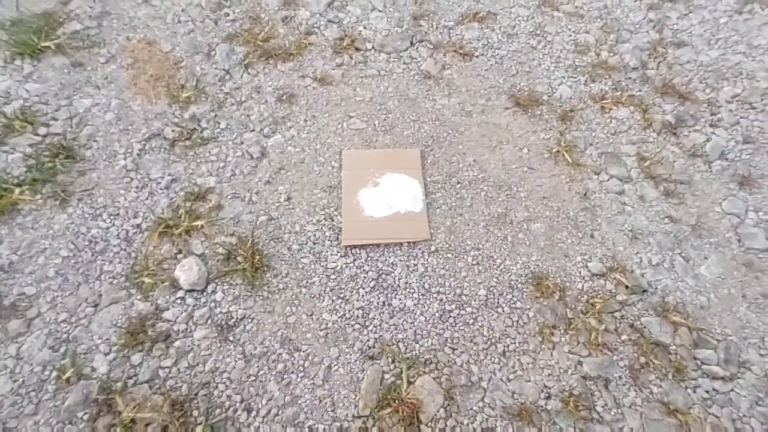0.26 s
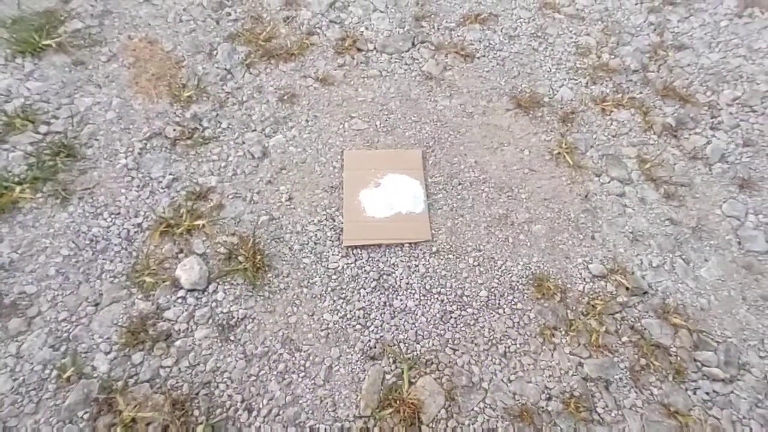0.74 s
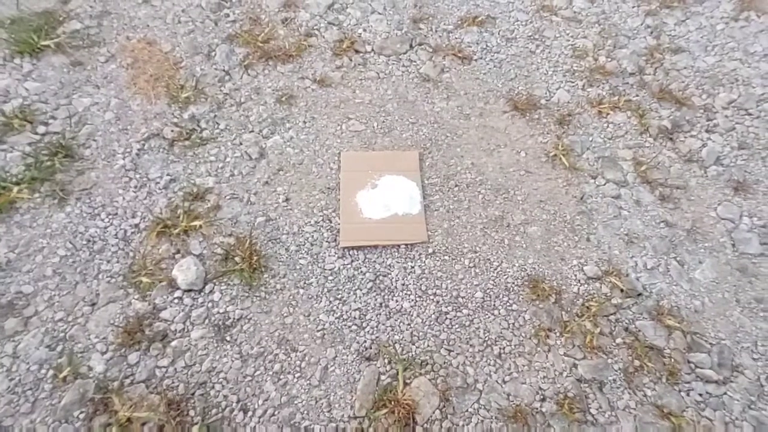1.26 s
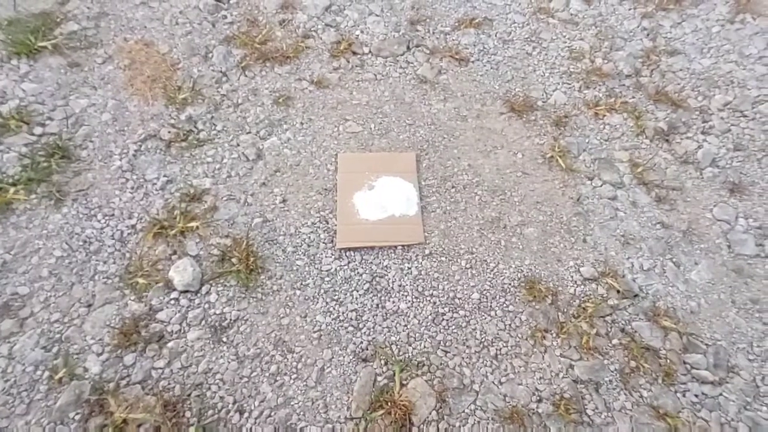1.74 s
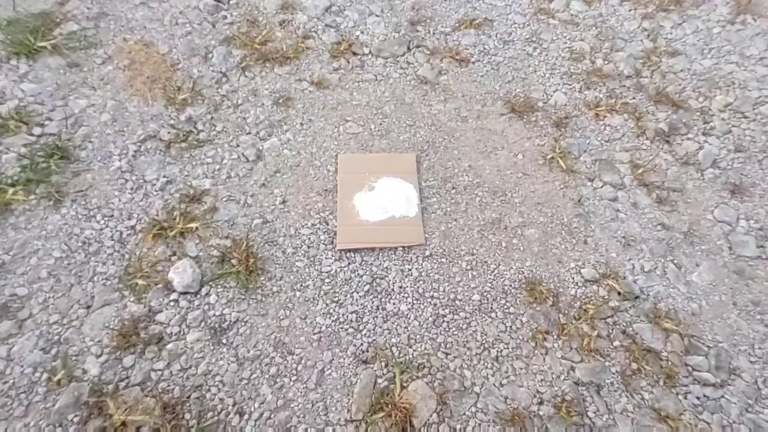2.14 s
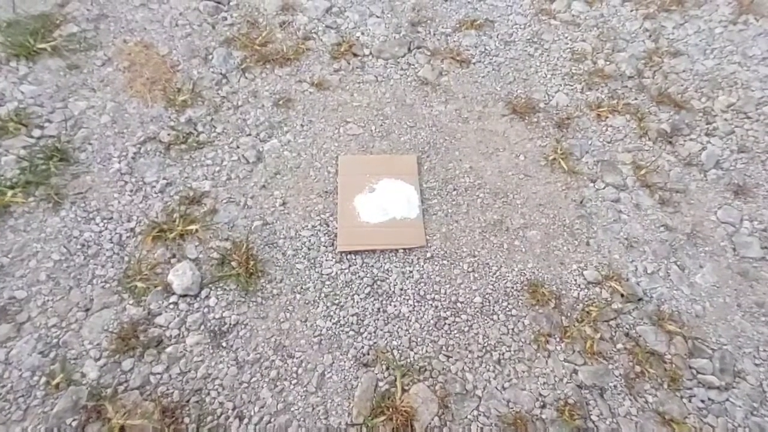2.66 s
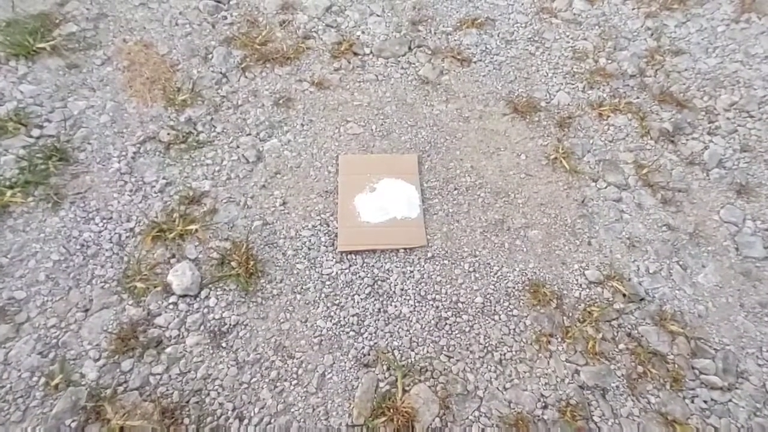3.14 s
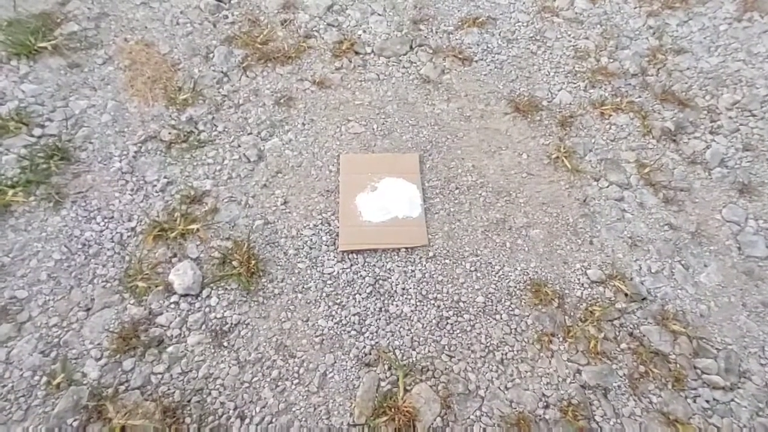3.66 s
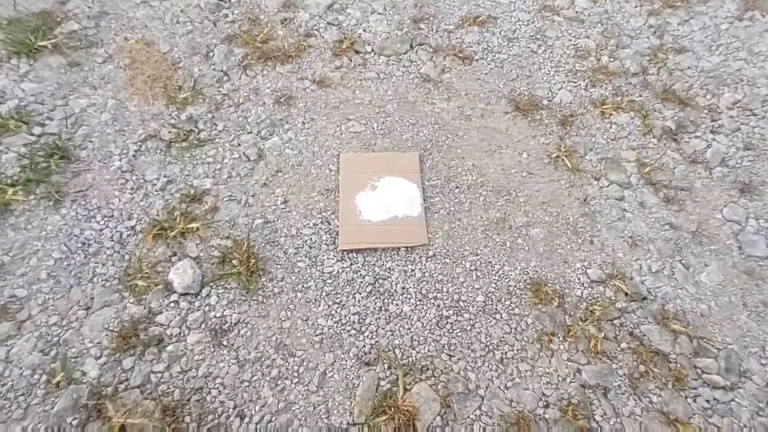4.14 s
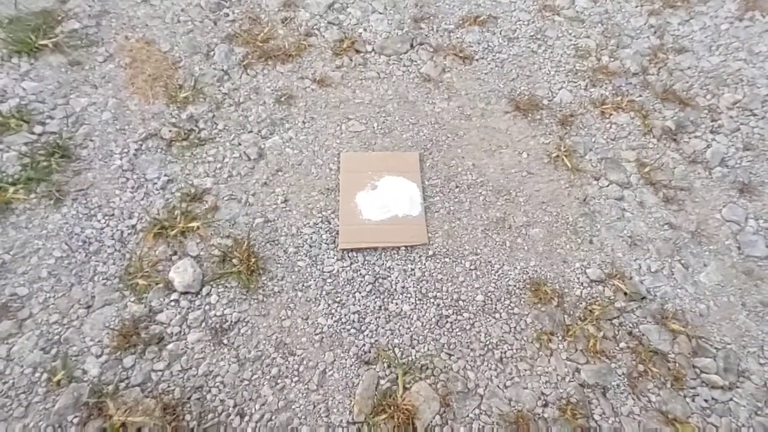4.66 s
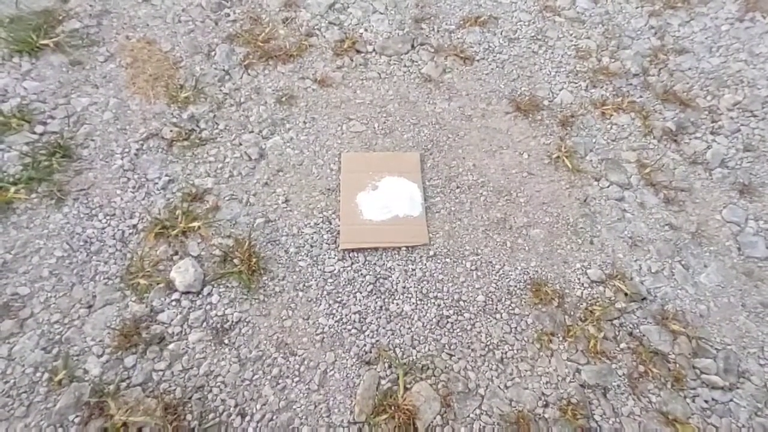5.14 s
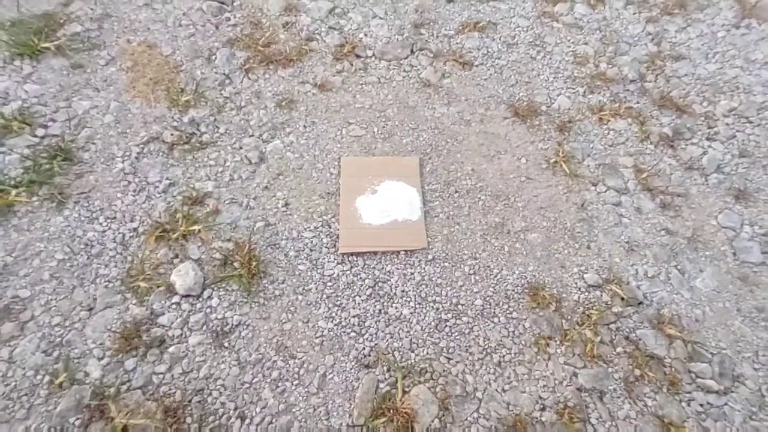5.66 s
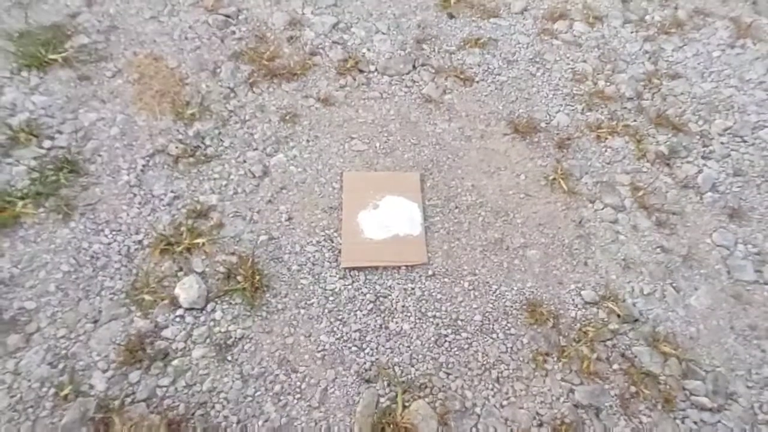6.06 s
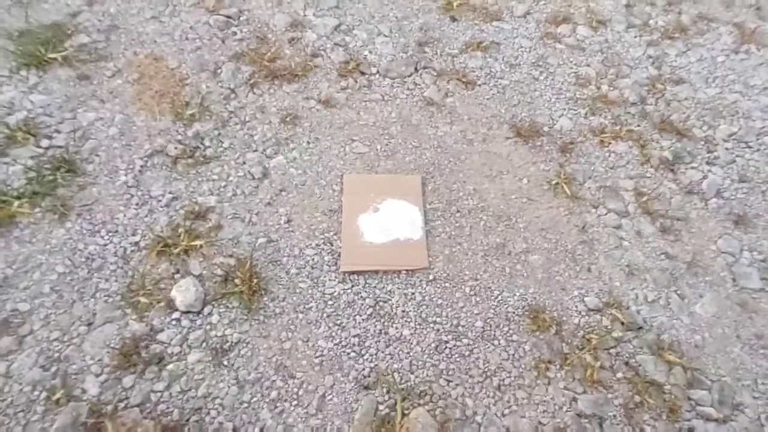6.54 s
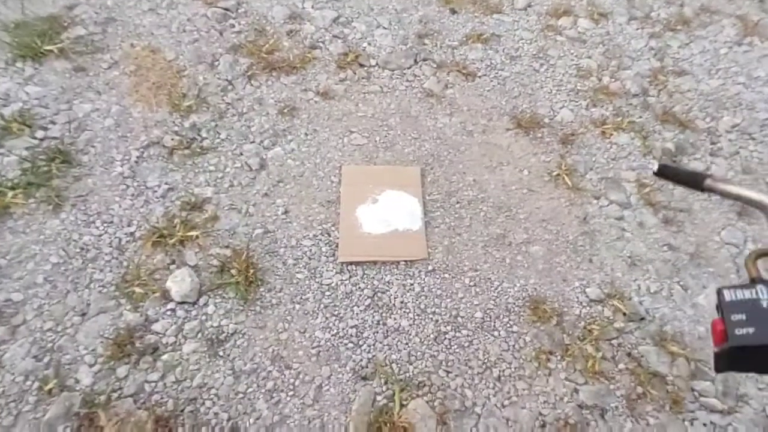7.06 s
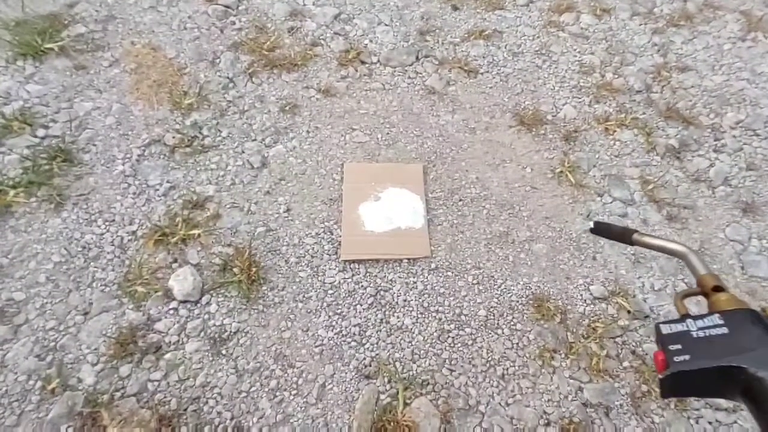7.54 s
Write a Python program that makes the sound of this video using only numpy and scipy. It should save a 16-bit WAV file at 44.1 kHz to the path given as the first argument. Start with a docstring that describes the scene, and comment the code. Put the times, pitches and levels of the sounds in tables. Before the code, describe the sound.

A handheld gas torch roars and hisses steadily outdoors, its tone sweeping upward like a slow flanger, dipping suddenly near the end, then rising again.

```python
"""A low roar and a bright hiss are heard at once, while notches sweep up the spectrum, later down and up again.
A handheld gas torch burns outdoors over gravel, close to a stereo microphone. Flame and gas jet are shaped noise.
The ground echo interferes with the direct sound as a comb filter; its delay changes as the torch is lowered and raised.
Echoes off things near the microphone and the body behind it add a fine ripple; a diffuse return surrounds them."""
import sys
import numpy as np
from scipy import signal
from scipy.fft import rfft, irfft, next_fast_len
from scipy.io import wavfile
from scipy.ndimage import uniform_filter1d, map_coordinates

SR = 44100
rng = np.random.default_rng(int(sys.argv[2]) if len(sys.argv) > 2 else 0)


def log_audio(samples):
    """Write samples as a 16-bit WAV file to the path given in sys.argv[1]."""
    # one column per channel
    frames = np.atleast_2d(samples).T
    # limit to full scale, then quantise
    limited = np.clip(frames, -1, 1)
    pcm = np.round(limited * 32767).astype(np.int16)
    wavfile.write(sys.argv[1], SR, pcm)


N = 343539   # length in samples

# Path of the torch: t/s, ground echo delay left/ms, the same right/ms, lag of the left port/ms
TORCH_PATH = [(0, 1.58, 1.86, 0.36), (.2, 1.26, 1.5, 0.33), (.38, 1.26, 1.67, 0.26), (.5, 0.93, 0.93, 0.2),
              (.64, 0.81, 0.91, 0.18), (.8, 0.54, 0.64, 0.19), (.94, 0.5, 0.55, 0.17),
              (1.2, .455, 0.51, 0.16), (1.32, 0.40, 0.39, 0.11), (1.7, 0.34, .385, 0.082),
              (2.1, 0.33, 0.37, 0.06), (2.5, 0.3, .36, 0.055), (2.9, 0.29, 0.35, 0.053),
              (3.12, 0.28, 0.32, 0.04), (3.3, 0.22, 0.24, 0.045), (3.55, 0.14, 0.18, 0.041),
              (4.3, 0.15, 0.17, 0.065), (4.72, 0.2, 0.21, 0.05), (5.2, 0.16, 0.15, 0.026),
              (5.55, 0.11, 0.097, 0.023), (5.95, 0.12, 0.14, 0.047), (6.2, 0.18, 0.15, .03),
              (6.3, 0.5, .44, 0.092), (6.38, 0.82, 0.97, .09), (6.45, 1.14, 1.34, 0.11),
              (6.56, 1.56, 1.65, 0.15), (6.65, 2, 2.06, .24), (6.74, 2, 2.2, 0.32), (6.88, 1.5, 1.7, 0.26),
              (7.0, 1.14, 1.37, 0.12), (7.15, 1.03, 1.2, 0.067), (7.22, 0.81, 0.74, 0.045),
              (7.28, 0.4, 0.39, 0.053), (7.4, 0.48, 0.44, 0.069), (7.48, 0.35, 0.37, .056),
              (7.56, 0.14, 0.2, 0.068), (7.64, 0.11, 0.14, 0.057), (7.79, 0.14, 0.16, 0.075)]
# Extra lag of the treble at the left port, earlier where negative: t/s, lag/ms
TREBLE_LAG = [(.45, 0), (.6, -.022), (.9, -.03), (1.15, -.012), (1.3, .006), (1.7, .02), (2.1, .03),
              (2.9, .04), (3.2, .035), (3.5, 0)]
TREBLE_LAG_FROM_HZ = 3000

# Strength of the burn before panning and echoes: t/s, roar level/dB, hiss level/dB, roar bass against its rest/dB
BURN_LEVELS = [(0, -25.5, -34.5, -4), (.5, -25.5, -33, 0), (1.0, -26, -33, -1.5), (2.0, -27, -32, 0),
               (3.0, -25.5, -32.5, -0.8), (3.6, -28, -33.5, 1.5), (4.6, -26.5, -34, 1.5),
               (5.4, -27, -32.5, -1), (6.0, -26, -34, -1.2), (6.35, -27, -33, -0.8), (6.55, -25.5, -34, -3),
               (6.7, -26, -39, -5), (6.85, -25, -35, -2.5), (7.1, -27, -30, -3), (7.35, -26, -33, -2),
               (7.55, -28, -34.5, 2), (7.79, -25, -35.5, -1)]
LOUD_SPOT_S, LOUD_SPOT_WIDTH_S, LOUD_SPOT_DB, LOUD_SPOT_TOP_HZ = 7.22, 0.025, 5.5, 2000   # brief, below 2 kHz

# Relative noise spectra of the flame, the body of the hiss and its top: f/Hz, level per Hz/dB
ROAR_SPECTRUM = [(13, -88), (30, -66), (60, -37.5), (100, -30.5), (161, -12), (200, -7), (278, -5.5),
                 (400, -9), (560, -6), (750, -8.5), (1100, -8.5), (1580, -11), (2000, -13.5), (2400, -17),
                 (4230, -19.5), (5200, -22), (6800, -47)]
HISS_SPECTRUM = [(2120, -43), (3600, -10), (4220, -16), (4650, 2), (5050, 9), (5350, 9), (6560, 0.5),
                 (7140, 2.5), (7900, -12.5), (8200, -25), (10700, -53), (18000, -120)]
HISS_TOP_SPECTRUM = [(4120, -18.5), (7000, -2), (7910, -6.5), (8720, 0), (9690, -6.5), (11700, -3.5),
                     (12400, -7), (13200, -18.5)]
# Share of the roar that counts as bass, equally loud at both ports: f/Hz, level/dB
BASS_SHARE = [(220, 0), (700, -30)]
# Port colour for roar and hiss: f/Hz, left minus right level/dB
ROAR_BALANCE = [(500, -8), (870, -1), (1200, -1), (1700, -2), (2300, -6), (2800, -13.5), (3500, -6),
                (5000, 0.5)]
HISS_BALANCE = [(3600, -12.5), (4300, -2), (4900, -0.5), (5400, 1), (6000, -4), (7000, -3), (7800, -13),
                (8700, -10.5), (9700, 3), (11000, 10), (12700, 0)]
# Coherence: the ports hear different parts of the long flame: f/Hz, left-right likeness/1
PORT_LIKENESS = [(25, .3), (60, 0.74), (130, 1), (500, 1), (1000, 0.99), (2000, 0.71), (2600, 0.55),
                 (3200, .9), (3700, .96), (4500, .96), (5000, 0.17), (7000, 0.046), (13000, 0.046)]

# Effect of bearing; the lag grows as the torch moves to the right: level straight ahead/dB, slope/(dB per ms of lag)
ROAR_PAN_RULE = (7.56, -9)   # left minus right
HISS_PAN_RULE = (-0.64, -36)   # left minus right
TOP_SHARE_RULE = (-8.5, 21.8)   # top of the hiss against its body

# Edges of the bands in which the upper flame noise flickers: f/Hz
PATCH_EDGES = [1500, 2100, 2900, 3800, 4800]
PATCHY_DB, PATCHY_DB_PER_SPEED = .9, .2   # at rest; added per ms/s of echo delay change, as air stirs the flame
TREMOR = .025   # hand shake: spread of the ground echo delay as a share of it

# Reflection off gravel, which scatters the treble: f/Hz, level/dB
GROUND_SPECTRUM = [(100, -4.5), (1000, -1.5), (2500, -5), (3400, -7), (4200, -9), (5000, -15), (6000, -20),
                   (12000, -39)]
# Balance of the ground echo: f/Hz, left minus right level/dB
GROUND_BALANCE = [(300, 0), (1200, -4), (2500, -3), (4000, 1.5), (6000, 0)]
SCATTER_HZ, SCATTER_DB_PER_MS = 1500, -5   # more treble is scattered from higher up
SCATTERED_DB = -17   # level of the scattered treble, before its share is applied
HIGH_MS, HIGH_DB_PER_MS = 1.45, -16   # held high: beyond this delay the ground echo weakens
HIGH_SPLIT_HZ, HIGH_UPPER_DB_PER_MS = 700, -1   # above this frequency it loses less

# Echoes off things near the microphone: left delay/ms, left level/dB, right delay/ms, right level/dB,
# growth of the delay/(ms per ms of ground echo delay)
NEAR_REFLECTIONS = [(1.1, -20, 1.1, -26.5, 0.11), (1.55, -23, 1.12, -12, 0.086),
                    (2.1, -19.5, 2.155, -13.5, 0.33), (2.8, -10, 2.825, -14.5, 0.73),
                    (3.9, -13.5, 4.5, -14.5, 0.57)]
NEAR_FROM_HZ, NEAR_CUT_HZ, NEAR_TOP_HZ = 220, 2300, 3740
NEAR_ON_GROUND = 0.19   # share of the ground echo, which arrives from below, that stirs the nearby echoes

# Echoes off the body behind the microphone: delay with the torch on the ground/ms, left gain/1, right gain/1
BODY_REFLECTIONS = [(1.37, 0.021, -0.056), (1.62, -0.015, -0.16)]
BODY_MS_PER_MS = 1.105   # growth of their delay with the ground echo delay

# Sound thrown back from all round, different at each port: f/Hz, level/dB
DIFFUSE_SPECTRUM = [(300, -49), (1000, -17), (2000, -17), (3200, -9), (4500, -19), (8000, -40)]
# Narrow hollows in the ports: f/Hz, width/Hz, left depth/1, right depth/1
PORT_DIPS = [(543, 43, 0.01, 0.63), (1115, 57, 0.67, 0.27), (1430, 82, 0.03, 0.64), (1534, 27, 0.07, 0),
             (1870, 32, 0.6, 0.8), (2194, 57, 0.96, 0.6), (2620, 30, 0.1, 0.34), (2790, 30, 0.2, 0.15),
             (3470, 65, 0.1, 0.84), (4130, 75, 0.6, .2)]
CUTOFF_HZ = 13200   # upper edge of the microphone band


def from_db(db):
    """A level is twenty times the logarithm of its amplitude gain."""
    return 10 ** (np.asarray(db) / 20)


def rms_one(x):
    """Division by the root mean square gives unit effective amplitude."""
    return x / np.sqrt(np.mean(x ** 2) + 1e-20)


def in_time(rows):
    """Linear interpolation turns each table column into one value per sample."""
    t_s, *columns = np.transpose(rows)
    return [np.interp(np.arange(N) / SR, t_s, column) for column in columns]


def bins_hz():
    """The discrete spectrum has equally spaced frequencies; zero is raised to 1 Hz."""
    return np.maximum(np.fft.rfftfreq(next_fast_len(N), 1 / SR), 1)


def on_bins(points):
    """A spectrum table is interpolated on a logarithmic frequency axis."""
    hz, values = np.transpose(points)
    return np.interp(np.log(bins_hz()), np.log(hz), values)


def below(hz, order):
    """Low-pass gain without phase shift, one half at the given frequency."""
    return 1 / (1 + (bins_hz() / hz) ** order)


def above(hz, order):
    """High-pass gain without phase shift, one half at the given frequency."""
    return 1 / (1 + (hz / bins_hz()) ** order)


def coloured(x, gain):
    """Linear filtering is multiplication of the spectrum by a gain."""
    size = next_fast_len(N)
    return irfft(rfft(x, size) * gain, size)[..., :N]


def drift(rate_hz):
    """Low-passed noise is a slow random process, here of unit rms."""
    step = 40   # samples between drawn values
    pole = np.exp(-2 * np.pi * step * rate_hz / SR)
    noise = rng.standard_normal(N // step + 2002)
    slow = signal.lfilter([1], [1, -2 * pole, pole * pole], noise)[2000:]   # the filter has settled
    return np.interp(np.arange(N) / step, np.arange(len(slow)), rms_one(slow))


def late(x, ms):
    """Propagation delay, fixed or moving, by cubic interpolation; the ends are mirrored."""
    return map_coordinates(x, [np.arange(N) - ms * SR / 1000], order=3, mode="mirror")


def late_pair(pair, left_ms, right_ms):
    """Each port has its own path length and hence its own delay."""
    return np.array([late(pair[0], left_ms), late(pair[1], right_ms)])


def sides(pan_db):
    """A level difference is divided equally between left and right gains."""
    return from_db([pan_db / 2, -pan_db / 2])


def with_bearing(rule):
    """Level varies linearly with the time difference between the ports."""
    ahead_db, db_per_ms = rule
    return ahead_db + db_per_ms * in_time(TORCH_PATH)[2]


def diffuse_field(torch):
    """Diffuse reflection: widely shifted copies are out of step with the source and with each other."""
    shifted = [np.roll(torch[0], N // 3), np.roll(torch[1], -N // 3)]
    return coloured(shifted, from_db(on_bins(DIFFUSE_SPECTRUM)))


def body_echoes(arriving, echo_ms):
    """Specular reflection off the body: the delays shorten as the torch is lowered."""
    small = above(NEAR_FROM_HZ, 2)   # small obstacles return no bass
    dull = coloured(arriving, small / (1 + 1j * bins_hz() / NEAR_CUT_HZ))
    total = 0
    for ms, left, right in BODY_REFLECTIONS:
        delay_ms = ms + BODY_MS_PER_MS * echo_ms
        total = total + np.array([[left], [right]]) * late_pair(dull, delay_ms, delay_ms)
    return total


def near_echoes(arriving, echo_ms):
    """Early reflections off small obstacles, with neither deep bass nor full treble, add a fine ripple."""
    small = above(NEAR_FROM_HZ, 2)
    dulling = below(NEAR_TOP_HZ, 4) / (1 + 1j * bins_hz() / NEAR_CUT_HZ)
    faint = coloured(arriving, small * dulling)
    total = 0
    for left_ms, left_db, right_ms, right_db, growth in NEAR_REFLECTIONS:
        delayed = late_pair(faint, left_ms + growth * echo_ms, right_ms + growth * echo_ms)
        total = total + from_db([[left_db], [right_db]]) * delayed
    return total


def gravel_reflection(torch, echo_ms):
    """Rough-surface reflection: coherent treble falls with echo delay as the scattered part grows."""
    bounced = coloured(torch, from_db(on_bins(GROUND_SPECTRUM)) * sides(on_bins(GROUND_BALANCE)))
    treble = coloured(bounced, above(SCATTER_HZ, 2))
    mirrored = from_db(SCATTER_DB_PER_MS * np.maximum(echo_ms - .45, 0))
    scattered = np.roll(treble, N // 2, axis=1)   # same colour, out of step with the direct sound
    scattered = from_db(SCATTERED_DB) * scattered * np.sqrt(1 - mirrored ** 2)
    bounced = bounced - treble * (1 - mirrored) + scattered
    deep = coloured(bounced, below(HIGH_SPLIT_HZ, 4))
    excess_ms = np.maximum(echo_ms - HIGH_MS, 0)
    upper = (bounced - deep) * from_db(HIGH_UPPER_DB_PER_MS * excess_ms)
    return deep * from_db(HIGH_DB_PER_MS * excess_ms) + upper


def treble_shift(torch):
    """Interaural-type time difference: treble reaches the left port slightly earlier or later."""
    treble = coloured(torch[0], above(TREBLE_LAG_FROM_HZ, 8))
    return np.array([torch[0] - treble + late(treble, in_time(TREBLE_LAG)[0]), torch[1]])


def outdoors(torch):
    """Superposition: direct sound and ground echo form a comb filter, and weaker returns are added."""
    left_echo_ms, right_echo_ms, lag_ms = in_time(TORCH_PATH)
    torch = treble_shift(torch)
    shake = 1 + TREMOR * drift(14.0)
    echo_ms = (left_echo_ms + right_echo_ms) / 2
    direct = np.array([late(torch[0], lag_ms), torch[1]])
    bounced = gravel_reflection(torch, echo_ms)
    ground = late_pair(bounced, lag_ms + shake * left_echo_ms, shake * right_echo_ms)
    arriving = direct + NEAR_ON_GROUND * ground
    near = near_echoes(arriving, echo_ms)
    body = body_echoes(arriving, echo_ms)
    return direct + ground + near + body + diffuse_field(torch)


def turbulence(spectrum, balance):
    """Partial coherence: mid and side noises give two ports of set likeness, with unit rms overall."""
    size = next_fast_len(N)
    alike = np.clip(on_bins(PORT_LIKENESS), 0, 1)
    mid, side = rfft(rng.standard_normal((2, size)))
    pair = np.sqrt(1 + alike) * mid + np.sqrt(1 - alike) * side * [[1], [-1]]
    shaped = pair * from_db(on_bins(spectrum)) * sides(on_bins(balance))
    return rms_one(irfft(shaped, size)[:, :N])


def patchy(flame):
    """Amplitude modulation by band: each flickers on its own, more while the torch moves."""
    delay_rate = np.abs(np.gradient(in_time(TORCH_PATH)[1]) * SR)   # right echo delay, ms/s
    speed = uniform_filter1d(delay_rate, SR // 4)
    depth_db = PATCHY_DB + PATCHY_DB_PER_SPEED * np.minimum(speed, 4)
    result = flame
    for low, high in zip(PATCH_EDGES, PATCH_EDGES[1:]):
        band = coloured(flame, (bins_hz() >= low) & (bins_hz() < high))
        result = result + band * (from_db(depth_db * drift(14.0)) - 1)
    return result


def hiss():
    """Jet noise from the burner tube: the body and top of the spectrum flicker partly together."""
    together = drift(5.7)
    body_db = 0.5 * together + 1.05 * drift(36.0)
    body = from_db(body_db) * turbulence(HISS_SPECTRUM, HISS_BALANCE)
    top_db = with_bearing(TOP_SHARE_RULE) + 0.17 * together + 1.0 * drift(18.0)
    top = from_db(top_db) * turbulence(HISS_TOP_SPECTRUM, HISS_BALANCE)
    level_db = in_time(BURN_LEVELS)[1]
    return from_db(level_db) * sides(with_bearing(HISS_PAN_RULE)) * (body + top)


def roar():
    """Combustion noise with flutter; by diffraction, long waves pass the microphone and stay central."""
    level_db, _, bass_db = in_time(BURN_LEVELS)
    flutter_db = 0.7 * drift(14.7) + .5 * drift(46.0)
    whole = turbulence(ROAR_SPECTRUM, [(300, 0)])   # no imbalance at this stage
    share = from_db(on_bins(BASS_SHARE))
    bass = from_db(bass_db) * coloured(whole, share)
    rest = coloured(whole, (1 - share) * sides(on_bins(ROAR_BALANCE)))
    flame = bass + sides(with_bearing(ROAR_PAN_RULE)) * rest
    from_peak = (np.arange(N) / SR - LOUD_SPOT_S) / LOUD_SPOT_WIDTH_S
    loud_spot = from_db(LOUD_SPOT_DB * np.exp(-.5 * from_peak ** 2)) - 1
    low = coloured(flame, below(LOUD_SPOT_TOP_HZ, 4))
    return from_db(level_db + flutter_db) * (flame + loud_spot * low)


def scene():
    """Superposition of combustion and jet noise, propagated in the open."""
    return outdoors(patchy(roar() + hiss()))


def record(dry):
    """Microphone response: the ports hollow out narrow bands and a steep low-pass cuts the top."""
    ports = 1
    for hz, width_hz, left, right in PORT_DIPS:
        depth = np.clip([[left], [right]], 0, 1)
        ports = ports * (1 - depth / (1 + (2 * (bins_hz() - hz) / width_hz) ** 2))
    low_pass = signal.ellip(12, .5, 75, CUTOFF_HZ, fs=SR, output="sos")   # ripple and stop band in dB
    return signal.sosfilt(low_pass, coloured(dry, ports))


dry = scene()
out = record(dry)
log_audio(out)
```